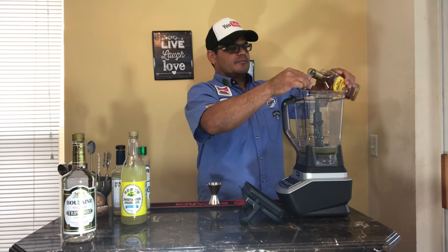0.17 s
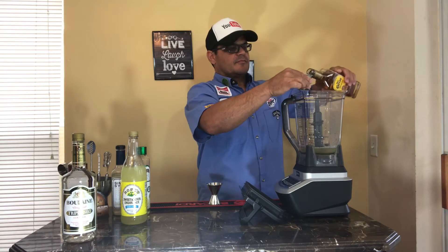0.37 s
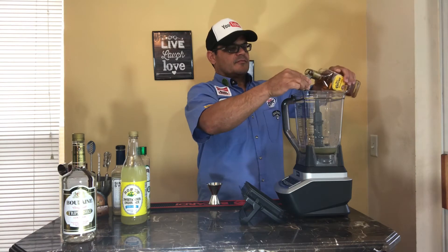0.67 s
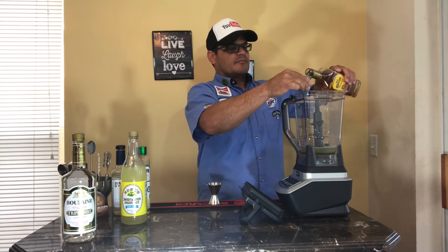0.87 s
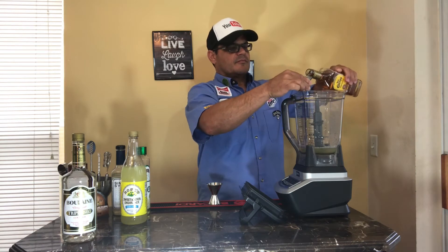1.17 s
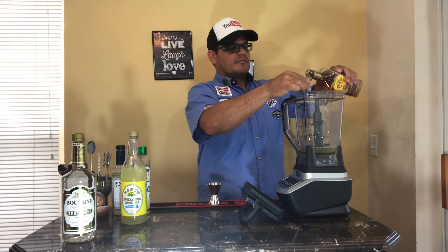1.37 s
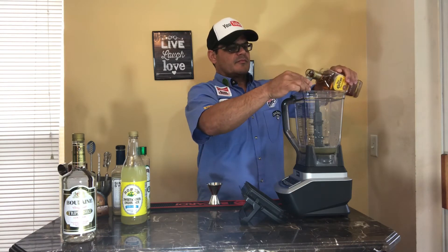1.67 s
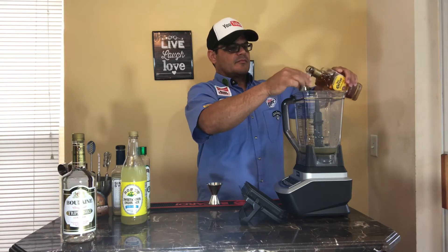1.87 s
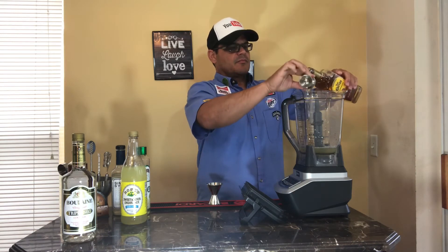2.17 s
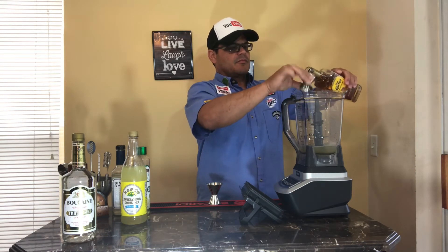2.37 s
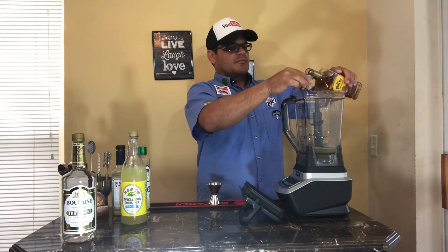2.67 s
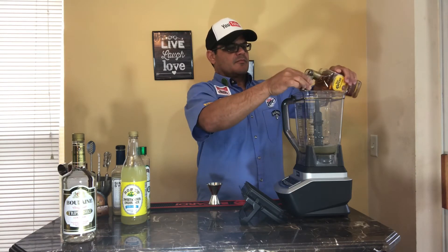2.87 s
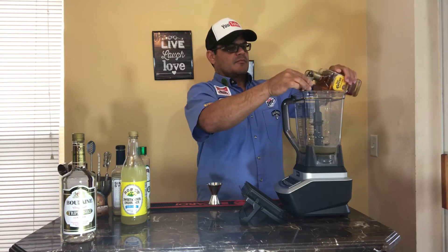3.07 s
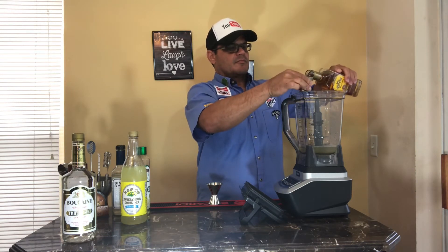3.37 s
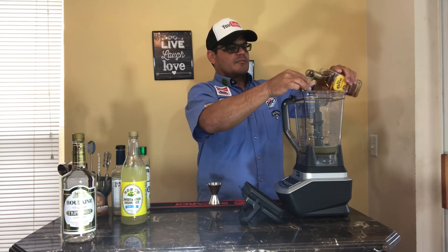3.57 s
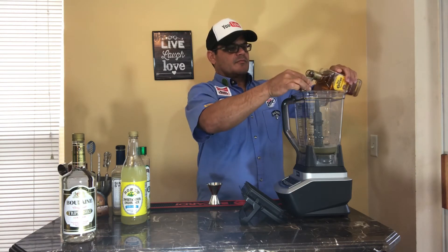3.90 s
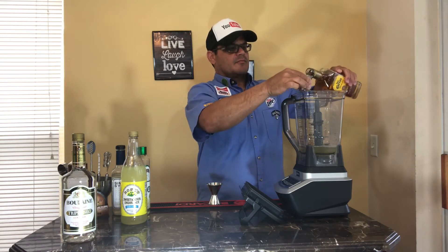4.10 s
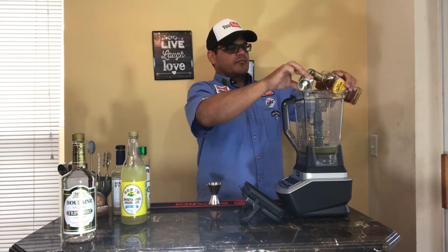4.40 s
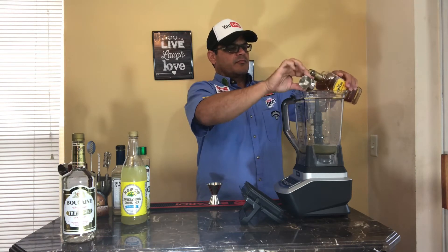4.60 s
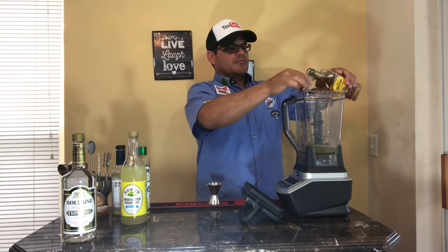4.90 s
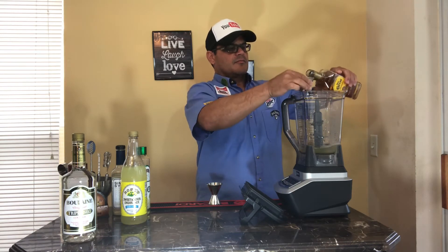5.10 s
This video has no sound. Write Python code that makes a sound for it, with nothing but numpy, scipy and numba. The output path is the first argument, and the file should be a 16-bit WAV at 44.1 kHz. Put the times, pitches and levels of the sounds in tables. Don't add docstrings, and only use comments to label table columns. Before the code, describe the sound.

Quiet dripping trickle with tiny ringing bubbles, twice broken by brief splashy gushes into a hollow blender jar, in a small humming room.

```python
import sys
import numpy as np
from scipy import signal
from scipy.fft import rfft, irfft
from scipy.io import wavfile
from scipy.ndimage import uniform_filter1d
from numba import njit

SR = 44100
rng = np.random.default_rng(int(sys.argv[2]) if len(sys.argv) > 2 else 0)


def generate_wav(sig):
    pcm = np.round(np.clip(np.atleast_2d(sig).T, -1, 1) * 32767).astype(np.int16)
    wavfile.write(sys.argv[1], SR, pcm)


def level_to_linear(level):
    exponent = np.asarray(level, float) / 20
    return 10 ** exponent


N = 231392
T = np.arange(N) / SR

# t/s, peak level/dB, centre f/Hz, bandwidth over
SPITTING_DROPS = [(0.029, -48, 7200, 0.14), (0.156, -52, 9400, 0.45), (0.226, -50.5, 8400, 0.22),
                  (0.328, -58, 6330, 0.26), (0.4095, -58, 7760, 0.52), (0.435, -49.5, 5350, 0.39),
                  (0.4944, -47, 12700, 0.77), (0.5791, -57, 13900, 0.14), (0.6015, -52.5, 9100, 0.36),
                  (0.434, -51, 11400, 0.12), (0.702, -56, 10900, 0.3), (0.7342, -54, 10700, 0.2),
                  (0.834, -51, 9650, 0.36), (0.962, -45.5, 10000, 0.3), (0.972, -48, 6430, 0.58),
                  (0.51, -61, 9800, 0.3), (1.917, -54.5, 4950, 0.2), (1.0455, -50, 5300, 0.78),
                  (1.117, -46.5, 10200, 0.32), (0.233, -55, 12000, 0.39), (1.308, -48, 12500, 0.6),
                  (1.37, -46, 8370, 0.9), (1.499, -50.5, 9600, 0.17), (1.5599, -53, 11900, 0.35),
                  (1.622, -47, 9000, 0.23), (1.645, -44.5, 13500, 0.3), (1.719, -51, 5740, 0.12),
                  (1.764, -53.5, 5600, 0.14), (1.8206, -49, 4900, 0.5), (1.84, -45.5, 9350, 0.93),
                  (1.963, -51, 5800, 0.37), (2.0637, -50, 6130, 0.15), (2.1075, -48, 13100, 0.41),
                  (2.7591, -48, 12500, 0.49), (2.7945, -45.5, 8500, 0.28), (3.025, -53, 5130, 0.69),
               (3.16, -53, 9500, 0.088), (3.355, -66, 13500, 0.12), (3.305, -60, 9800, 0.1),
               (4.395, -51, 4770, 0.25), (3.1988, -48, 9600, 0.44), (3.251, -49, 7000, 0.44),
               (3.2552, -44.5, 10000, 0.47), (3.61, -53, 4530, 0.45), (3.74, -50, 12500, 0.3),
               (3.403, -53, 7200, 0.41), (3.4865, -56, 5140, 0.1), (3.514, -49, 6300, 0.43),
               (3.674, -49.5, 13900, 0.67), (3.72, -52, 8860, 0.37), (3.839, -48, 8840, 0.97),
               (3.915, -51.5, 5540, 0.26), (3.982, -46.5, 8600, 0.4), (4.111, -48.5, 9500, 0.31),
               (4.1936, -47.5, 5800, 0.93), (4.2507, -50, 10900, 0.39), (4.271, -46.5, 5640, 0.28),
               (4.356, -51.5, 10200, 0.57), (5.099, -46.5, 6100, 0.79), (5.134, -47.5, 4930, 0.84),
               (5.202, -47, 5100, 0.43)]
FILL_DROPS = SPITTING_DROPS


def level(x, db):
    return x * level_to_linear(db) / np.sqrt(np.mean(x ** 2))


def colour(x, points):
    hz, db = np.transpose(points)
    f = np.maximum(np.fft.rfftfreq(N, 1 / SR), 1)
    return irfft(rfft(x) * level_to_linear(np.interp(np.log(f), np.log(hz), db)), N)


def band(x, hz, width_hz):
    f = np.fft.rfftfreq(len(x), 1 / SR)
    detuning = (f ** 2 - hz ** 2) / (np.maximum(f, 1) * width_hz)
    return irfft(rfft(x) / (1 + 1j * detuning), len(x))


def walk(rate):
    k = int(SR / rate)
    held = np.repeat(rng.standard_normal(N // k + 1), k)
    return uniform_filter1d(uniform_filter1d(held, k), k)[:N]


def patchy(x, lo_hz, patchy_db, rate, count):
    place = 3 * np.log2(np.maximum(np.fft.rfftfreq(N, 1 / SR), 1) / lo_hz)
    out = np.zeros(N)
    for k in range(count):
        third_octave = irfft(rfft(x) * np.clip(1 - abs(place - k), 0, 1), N)
        out += level_to_linear(patchy_db * walk(rate)) * third_octave
    return out


def swells(rows, rest_db):
    power = level_to_linear(rest_db) ** 2
    for s, db, half_s in rows:
        power = power + level_to_linear(db) ** 2 * np.exp(-((T - s) / half_s) ** 2)
    return np.sqrt(power)


def decay_factor(t60_s):
    return np.exp(-np.log(1000) / (np.maximum(t60_s, .01) * SR))


@njit
def grains(start, hz, decay, glide, size):
    out = np.zeros(N)
    for k in range(len(start)):
        step = 2 * np.pi * hz[k] / SR
        a, soft, phase, i = 1., 1., 0., start[k]
        while a > .003 and i < N:
            out[i] += size[k] * a * (1 - soft) * np.sin(phase)
            phase += min(step * (1 + glide[k] * (1 - a)), 3.)
            a *= decay[k]
            soft *= 1 - step / 12
            i += 1
    return out


def froth(count, lo_hz, hi_hz, cycles, scatter_db, rise):
    when, pitch, size = rng.random((count, 3)).T
    hz = lo_hz * (hi_hz / lo_hz) ** pitch
    decay = np.exp(-hz / (cycles * SR))
    rain = grains((when * N).astype(np.int64), hz, decay, rise + 0 * hz, level_to_linear(scatter_db * size))
    return level(rain, 0)


def drone(hz, width_hz, db):
    steady = np.clip(1.6 - 1.61 * width_hz / 7.17, 0, .95)
    rough = level(band(band(rng.standard_normal(N), hz, width_hz), hz, width_hz), 0)
    tone = np.sin(2 * np.pi * np.cumsum(hz + 1.216 * walk(6)) / SR)
    return level_to_linear(db) * (np.sqrt(1 - steady) * rough + np.sqrt(2 * steady) * tone)


def duct_throb():
    # t/s, level/dB, half length/s
    throbs = [(0.09, -29.5, 0.056), (0.31, -29, 0.063), (0.7, -35.5, 0.28), (1.0, -30.5, 0.078),
              (1.25, -35, 0.07), (1.4, -31, 0.032), (1.65, -30.5, 0.044), (2.0, -35.5, 0.48),
              (2.49, -30.5, 0.033), (2.7, -35, 0.049), (2.89, -30.5, 0.048), (3.12, -32, 0.079),
              (3.32, -26, 0.053), (3.57, -26.5, 0.077), (3.95, -31, 0.06), (4.35, -33, 0.37),
              (4.75, -40.5, 0.18), (5.12, -30.5, 0.069)]
    throb = np.sin(2 * np.pi * np.cumsum(19.8 + 2.304 * walk(4.5)) / SR)
    return level(throb, 0) * swells(throbs, rest_db=-48)


def ventilation():
    # f/Hz, level/dB per Hz
    air_spectrum = [(35, -15), (60, -11), (98, -12), (152, -8.5), (232, -12.5), (369, -12.5), (477, -17.5),
                    (616, -21), (873, -20.5), (1490, -41.5), (1680, -29.5), (2730, -45.5), (4060, -62),
                    (9830, -46), (15700, -48)]
    # f/Hz, bandwidth/Hz, rms level/dB
    duct_modes = [(116.2, 7, -62.5), (150.3, 13.4, -68), (192.1, 5.3, -62.5), (227, 4.23, -57.5),
                  (235.8, 4.5, -61), (271, 7.6, -66), (293.2, 3.8, -61), (311.4, 7.2, -67.5),
                  (335, 8, -66.5), (402, 13.5, -72), (446, 7.8, -76.5), (473.8, 5, -69), (525.8, 3.3, -72)]
    out = level(colour(rng.standard_normal(N), air_spectrum), -57) + duct_throb()
    for row in duct_modes:
        out += drone(*row)
    # f/Hz, bandwidth/Hz, rms level/dB
    for hz, width_hz, db in [(34.6, 13.4, -49.5), (50.3, 8.4, -57), (58.7, 7, -54.5), (21.6, 4.5, -47.5)]:
        out += level(band(band(rng.standard_normal(N), hz, width_hz), hz, width_hz), db)
    return out


def flow():
    # t/s, flow level/dB, froth relative to flow/dB
    pours = [
        [(0.0, -50, 8.5), (0.05, -62, -18), (0.12, -87, 13), (0.17, -85, 3)],
        [(2.12, -83, 14), (2.18, -47, -20), (2.21, -50, -28), (2.22, -37, -14), (2.26, -46, -6.5),
         (2.4, -45, -4), (2.56, -49.5, 1.5), (2.64, -57.5, -2), (2.76, -62.5, -20)],
        [(4.45, -76, -2), (4.49, -41.5, -11), (4.5, -39.5, -20), (4.51, -42.5, -4), (4.66, -40, -7),
         (4.69, -46, -2), (4.76, -42.5, -5), (4.86, -56, 0.5), (4.94, -65.5, 6)],
        [(5.16, -72, 16), (5.22, -54, -14), (5.25, -79, -4)],
    ]
    stir_db, stir_lag_s, stir_s = -18, 0.037, 0.034
    stirs = [(s + stir_lag_s, db + stir_db, stir_s) for s, db, _, _ in FILL_DROPS]
    spraying = swells(stirs, rest_db=-71.5)
    frothing = level_to_linear(-62.5 - 0.5 * walk(6.9))
    for s, db, share_db in map(np.transpose, pours):
        gush = level_to_linear(np.interp(T, s, db)) * (T <= s[-1]) * (T >= s[0])
        spraying = np.hypot(spraying, gush)
        frothing = np.hypot(frothing, gush * level_to_linear(np.interp(T, s, share_db)))
    return spraying, frothing


def spray(spraying):
    # f/Hz, level/dB per Hz
    splash = [(1530, -7), (2600, -1.5), (2820, -1.5), (3140, 0), (3840, -2), (9330, -3.5), (15700, -10)]
    fine = froth(count=40000, lo_hz=2000., hi_hz=17160.0, cycles=7.7, scatter_db=0.0, rise=0.055)
    fine = patchy(signal.lfilter([1, -1], [1], fine), 2000., 3.6, 30, count=11)
    fine = level(colour(fine, splash), -5.0)
    fizz = level(patchy(colour(rng.standard_normal(N), splash), 3200., 4.5, 24, count=8), -72)
    return spraying * fine + fizz


def crackle(spraying):
    ticks = froth(count=1400, lo_hz=4950.0, hi_hz=15200.0, cycles=0.95, scatter_db=31, rise=0.077)
    return level_to_linear(-19.5) * np.hypot(spraying, level_to_linear(-62)) * ticks


def flecks():
    return level_to_linear(-81) * froth(count=420, lo_hz=2600., hi_hz=14460.0, cycles=36.0, scatter_db=34, rise=0.017)


def jar(coarse, frothing):
    # f/Hz, bandwidth/Hz, level/dB
    jar_modes = [(420.6, 42, 0), (1150, 1180, 10), (1800, 176, 8), (2270, 210, -9), (2780, 120, -7)]
    # t/s, level/dB, half length/s
    gulps = [
        (2.36, -54.5, 0.14),
        (2.6, -58, 0.061),
        (4.02, -58, 0.1),
        (4.31, -67, .06),
        (4.65, -53, 0.035),
        (4.82, -49.5, 0.05),
    ]
    ring = level(sum(level_to_linear(db) * band(coarse, hz, width_hz) for hz, width_hz, db in jar_modes[1:]), -7.0)
    column_hz, column_width_hz, _ = jar_modes[0]
    column = level(band(rng.standard_normal(N), column_hz, column_width_hz), -3.6)
    return frothing * ring + swells(gulps, rest_db=-68) * column


def measure(coarse):
    # f/Hz, bandwidth/Hz, rms level/dB
    cup_modes = [(1720, 35, -80), (2250, 650, -84.5), (2604, 150, -79), (3360, 23, -85)]
    return sum(level(band(coarse, hz, width_hz), db) * level_to_linear(0.7 * walk(22.5)) for hz, width_hz, db in cup_modes)


def stream():
    spraying, frothing = flow()
    coarse = froth(count=9000, lo_hz=810.0, hi_hz=3955.0, cycles=3.37, scatter_db=8.5, rise=0.081)
    return spray(spraying) + crackle(spraying) + flecks() + jar(coarse, frothing) + measure(coarse)


def ringing(rows):
    rise = 0.0078
    s, db, hz, t60_s = np.transpose(rows)
    start = (s * SR).astype(np.int64)
    return grains(start, hz * (1 - rise), decay_factor(t60_s), rise + 0 * hz, level_to_linear(db + 4.5))


def lone_bubbles():
    # t/s, peak level/dB, f/Hz, t60/s
    bubble_pings = [(0.001, -48, 1076, 0.016), (0.155, -62, 5300, 0.015), (0.233, -53, 11972, 0.016),
                    (0.444, -57, 7450, 0.015), (0.445, -63, 8311, 0.03), (0.457, -54, 2239, 0.015),
                    (0.512, -63.1, 9819, 0.02), (0.675, -56, 2300, 0.015), (0.695, -68.2, 4823, 0.02),
                    (1.0, -60, 7622, 0.015), (1.004, -60, 7321, 0.02), (1.021, -56, 3402, 0.025),
                    (1.129, -69.4, 13900, 0.015), (1.135, -68, 10900, 0.02), (1.182, -49, 1690, 0.02),
                    (1.229, -60, 7100, 0.025), (1.318, -65, 12704, 0.035), (1.764, -60.8, 5900, 0.015),
                    (1.823, -64.2, 11929, 0.02), (1.842, -60.3, 12747, 0.015), (1.843, -64, 8914, 0.015),
                    (1.916, -62, 5297, 0.015), (1.917, -60, 4740, 0.015), (1.966, -71.2, 11283, 0.04),
                    (2.0, -60, 4435, 0.02), (2.032, -67.2, 9733, 0.051), (2.036, -54.5, 2270, 0.017),
                    (2.046, -71.6, 10938, 0.015), (2.086, -64, 4780, 0.035), (2.706, -59, 13436, 0.025),
                    (2.924, -67, 5670, 0.091), (2.952, -63, 4800, 0.045), (2.99, -64, 7019, 0.025),
                    (3.045, -61, 10938, 0.015), (3.046, -71.3, 12144, 0.02), (3.05, -72.8, 14125, 0.065),
                    (3.164, -59, 9840, 0.03), (3.2, -64.6, 14384, 0.015), (3.256, -52, 9733, 0.025),
                    (3.403, -66, 11886, 0.016), (3.623, -66.1, 6200, 0.025), (3.719, -61, 7200, 0.015),
                    (3.926, -60, 13738, 0.015), (3.982, -59.3, 8096, 0.015), (4.115, -67.2, 14298, 0.025),
                    (4.264, -65.9, 13608, 0.015), (4.376, -54, 1650, 0.024), (4.405, -58, 2310, 0.025),
                    (2.137, -57, 4800, 0.02), (2.14, -56.8, 1690, 0.035), (2.16, -57.7, 7192, 0.015),
                  (2.171, -46.5, 10809, 0.015), (2.187, -51, 7321, 0.02), (2.188, -53.6, 6700, 0.043),
                  (2.223, -47.3, 7708, 0.015), (2.263, -43, 4060, 0.016), (2.315, -44, 9300, 0.015),
                  (2.321, -51.7, 12316, 0.015), (2.466, -52.6, 9948, 0.025), (2.469, -52, 9560, 0.05),
                  (2.532, -48, 10422, 0.015), (2.576, -55, 2480, 0.026), (2.613, -54, 7400, 0.02),
                  (2.63, -62.4, 12058, 0.015), (2.631, -59.8, 5200, 0.02), (2.631, -55, 4780, 0.035),
                  (2.636, -58, 9600, 0.08), (2.637, -57, 8268, 0.03), (4.459, -65.5, 7800, 0.015),
                  (4.495, -41, 11412, 0.015), (4.498, -45, 9948, 0.035), (4.587, -40.5, 1236, 0.075),
                  (4.634, -50, 5555, 0.04), (4.634, -45, 4392, 0.045), (4.731, -49.5, 9000, 0.035),
                  (4.736, -43, 4349, 0.015), (4.743, -49.0, 7019, 0.015), (4.747, -55, 5641, 0.095),
                  (4.823, -60, 11929, 0.03), (4.877, -55, 12900, 0.021), (4.878, -65.7, 13824, 0.015),
                  (4.939, -59, 4651, 0.022), (4.943, -62, 9700, 0.015), (5.099, -66.0, 14039, 0.025),
                  (5.101, -64, 13608, 0.03), (5.102, -57, 9130, 0.015), (5.102, -41, 2250, 0.018),
                  (5.149, -67.3, 13738, 0.02), (5.151, -65, 11400, 0.05), (5.152, -71.9, 14168, 0.02),
                  (5.197, -63, 4700, 0.065), (5.201, -57, 13695, 0.02), (5.208, -61, 9087, 0.016),
                  (5.208, -56, 3430, 0.015), (5.209, -62.5, 10077, 0.025), (5.21, -60.7, 7407, 0.015)]
    return ringing(bubble_pings)


def bubbles():
    # t/s, peak level/dB, f/Hz
    trickle_bubbles = [(0.006, -48, 3180), (0.048, -59, 2170), (0.166, -51, 810), (0.573, -51, 2250),
                       (0.085, -47, 2160), (1.015, -52, 1800), (1.161, -45, 1690), (1.183, -56, 2000),
                       (1.376, -46, 1720), (1.515, -45, 1720), (1.682, -40, 1114), (1.688, -35.5, 1680),
                       (1.76, -40, 1720), (1.775, -44, 2000), (3.03, -47.5, 1654), (3.195, -45, 1736),
                       (3.313, -49, 708), (3.59, -49, 1720), (3.837, -49, 2280), (3.969, -47, 1720),
                       (4.06, -52, 1720), (4.325, -41, 760), (4.35, -36.5, 767), (4.372, -39, 738),
                       (5.139, -39.5, 1720)]
    # t/s, peak level/dB, f/Hz, t60/s
    glugs = [(2.183, -49, 2290, 0.025), (2.219, -33, 1202, 0.066), (2.333, -41, 1150, 0.038),
             (2.358, -35, 1500, 0.049), (2.395, -41, 2430, 0.086), (2.406, -26.5, 1110, 0.032),
             (2.463, -34, 1080, 0.035), (2.49, -31, 1150, 0.041), (2.49, -35, 1450, .04),
             (2.521, -29, 1150, 0.036), (2.521, -31.5, 1800, 0.028), (2.225, -35, 1236, 0.055),
             (4.66, -47, 4370, 0.03), (4.618, -33, 3270, 0.033), (4.945, -52, 3130, 0.04),
             (2.576, -32.5, 2440, 0.038), (2.633, -44, 915, 0.035), (2.471, -36, 1150, 0.044),
             (2.274, -37, 1770, 0.05), (2.555, -51, 3460, 0.023), (4.481, -20, 2446, 0.025),
             (4.511, -43, 1050, 0.064), (4.543, -34, 940, 0.027), (4.575, -38, 1090, 0.05),
             (4.613, -32, 1240, 0.056), (4.726, -34.5, 1320, 0.04), (4.762, -24, 1225, 0.035),
             (4.825, -25, 1150, 0.019), (4.852, -33.5, 1090, 0.051), (4.913, -40, 1705, 0.035)]
    s, db, hz, t60_s = np.transpose([(*row, 0.038) for row in trickle_bubbles] + [*glugs])
    out = np.zeros(N)
    for lag_s, ratio, twin_db in [(0., 0.99, -7.5), (.005, 0.93, -8.5), (.011, 1.03, -14.5)]:
        start = ((s + lag_s) * SR).astype(np.int64)
        out += grains(start, hz * ratio, decay_factor(t60_s), 0.045 + 0 * hz, level_to_linear(db + twin_db))
    return level_to_linear(4 * walk(160)) * out


def spits(drops, rise_s, count=9):
    out, t = np.zeros(N + 8192), np.arange(8192) / SR
    for (s, db, hz, t60_s, share), noise in zip(drops, rng.standard_normal((len(drops), 8192))):
        width_hz = max(share, .05) * hz
        burst = level(band(band(noise, hz, width_hz), hz, 2 * width_hz), db - 11.5)
        envelope = (1 - np.exp(-t / rise_s)) * np.exp(-np.log(1000) * t / max(t60_s, .01))
        i = int(s * SR)
        out[i:i + 8192] += burst * envelope
    s, db, hz, t60_s, share = np.repeat(np.transpose(drops), count, axis=1)
    late, off = rng.random((len(s), 2)).T
    late_s = 0.26 * t60_s * late ** 1.4
    hz = np.minimum(hz * (1 + .8 * share * (2 * off - 1)), .4 * SR)
    size = level_to_linear(db - 15 - 40 * late_s / t60_s)
    start = ((s + late_s) * SR).astype(np.int64)
    return out[:N] + grains(start, hz, np.exp(-hz / (24 * SR)), .03 + 0 * hz, size)


def fill_spits():
    sprays = [(s, db, hz, .17, share) for s, db, hz, share in FILL_DROPS]
    snaps = [(s, db - 6, hz, .025, min(1.2 * share, 1)) for s, db, hz, share in FILL_DROPS]
    return spits(sprays, rise_s=0.0011) + spits(snaps, rise_s=0.0008, count=1)


def plops():
    # t/s, peak level/dB, centre f/Hz
    large_drops = [(0.0503, -40, 2127), (0.17, -47, 2610), (0.3306, -49.5, 2240), (0.8905, -51, 2810),
                   (1.1837, -42.5, 2000), (1.324, -50, 2420), (1.371, -47, 2830), (1.6454, -46.5, 3960),
                   (1.723, -43, 2920), (1.7604, -41, 2000), (2.138, -49, 3580), (2.1835, -40, 2620),
                   (2.2194, -35, 3840), (2.2461, -31.5, 2350), (2.3446, -45, 2230), (2.4682, -32.5, 4660),
                   (2.5775, -41, 2290), (2.6314, -42.5, 3700), (2.7611, -49.5, 2910), (2.9576, -49.5, 2220),
                   (3.027, -48, 1980), (3.3144, -47.5, 2820), (3.8377, -46.5, 2620), (3.934, -49, 2450),
                   (4.455, -49, 2180), (4.481, -27.5, 2460), (4.6109, -35, 2250), (4.7371, -52, 4560),
                   (5.1, -42, 2270), (5.1347, -43, 2280)]
    t60_s, share = 0.077, 0.141
    return spits([(*row, t60_s, share) for row in large_drops], rise_s=0.0014)


def clinks():
    # t/s, peak level/dB, f/Hz, t60/s
    metal_rings = [(.574, -59.5, 2260, 0.11), (0.65, -68.5, 3350, 0.17), (.887, -65, 3400, .08),
                   (4.481, -42.5, 2950, 0.028), (4.482, -36.5, 2200, 0.029), (1.183, -61, 2400, 0.045),
                   (2.219, -49, 1250, 0.078), (5.099, -45, 2800, .05), (5.1, -52, 2900, .05),
                   (5.099, -56, 3000, 0.074), (5.109, -54, 3600, 0.077), (5.105, -57.5, 1770, 0.092),
                   (5.146, -52, 2250, 0.037)]
    return ringing(metal_rings)


def air_hums():
    # t/s, peak level/dB, half length/s, f/Hz
    hum_rows = [
        (1.203, -56, 0.063, 333.7),
        (2.116, -57, 0.076, 330),
        (2.376, -49.5, 0.062, 401),
        (2.492, -63, 0.028, 411),
        (4.1, -57, .08, 335),
        (4.82, -49, .05, 402),
        (4.86, -50.5, .045, 440.4),
        (4.875, -58, 0.034, 575),
    ]
    out = np.zeros(N)
    for s, db, half_s, hz in hum_rows:
        out += level_to_linear(db) * np.exp(-((T - s) / half_s) ** 2) * np.sin(2 * np.pi * hz * T)
    return level_to_linear(2.8 * walk(44.95)) * out


def slaps():
    # t/s, peak level/dB, centre f/Hz, t60/s, bandwidth over centre [1]
    slap_rows = [(2.16, -37.5, 10800, 0.23, 0.56), (2.2237, -46, 5300, 0.1, 0.35),
                 (2.252, -30, 7200, 0.16, 0.64), (2.3153, -36.5, 9800, 0.41, 0.27),
                 (2.527, -36.5, 9600, 0.063, 0.42), (2.608, -45, 7900, 0.19, 0.93),
                 (4.4796, -34, 9800, 0.27, 0.9), (4.6334, -40, 5400, 0.059, 0.69),
                 (4.8244, -40.5, 12000, 0.075, 0.43), (5.098, -42, 3040, 0.0385, 0.99),
                 (5.01, -49, 4600, 0.18, 0.96), (2.5763, -39, 2600, 0.051, 0.57)]
    return spits(slap_rows, rise_s=0.0011)


def gurgle():
    churn = froth(count=2600, lo_hz=897.7, hi_hz=11030.0, cycles=14., scatter_db=16, rise=0.051)
    spraying, _ = flow()
    return level_to_linear(-10 + 3.7 * walk(35)) * spraying * churn


def room(x):
    t60_s, room_db = .3, -10
    t = np.arange(SR // 2) / SR
    tail = rng.standard_normal(len(t)) * np.exp(-np.log(1000) * t / t60_s) * (t > .004)
    tail /= np.sqrt(np.sum(tail ** 2))
    return x + level_to_linear(room_db) * signal.fftconvolve(x, tail)[:N]


def scene():
    liquid = stream() + lone_bubbles() + bubbles()
    liquid += fill_spits() + plops() + clinks() + air_hums() + slaps()
    return (ventilation() + room(liquid) + room(gurgle()))[None]


def top_cut(x):
    return signal.sosfilt(signal.butter(12, 15810, fs=SR, output="sos"), x)


def record(dry):
    low_pass = signal.ellip(8, .2, 70, 15650, fs=SR, output="sos")
    mix = signal.sosfilt(low_pass, dry)
    return top_cut(mix)


dry = scene()
out = record(dry)
generate_wav(out)
```